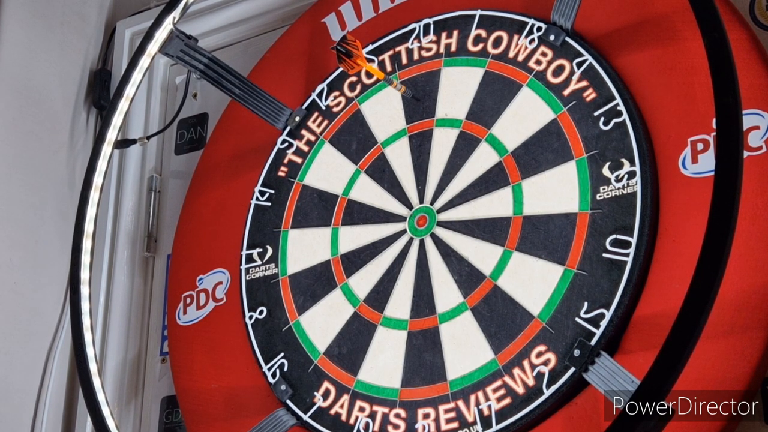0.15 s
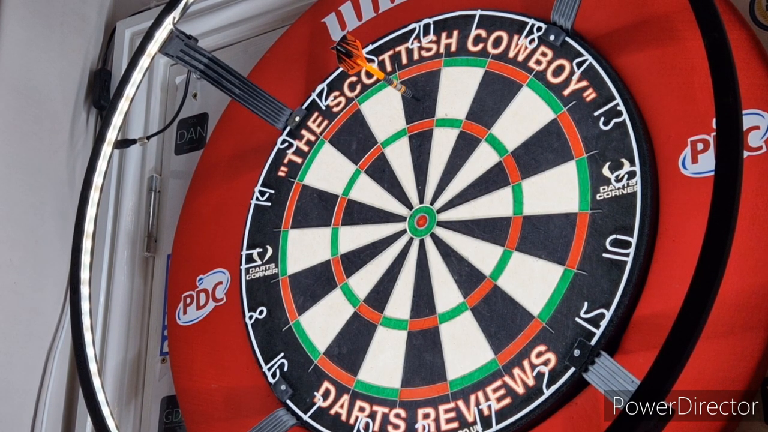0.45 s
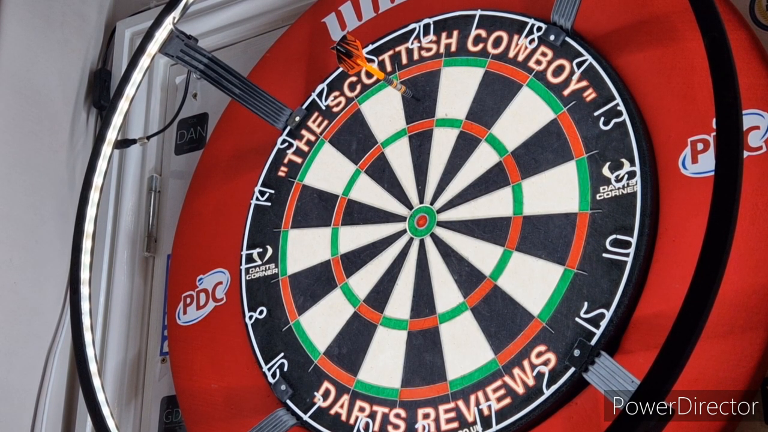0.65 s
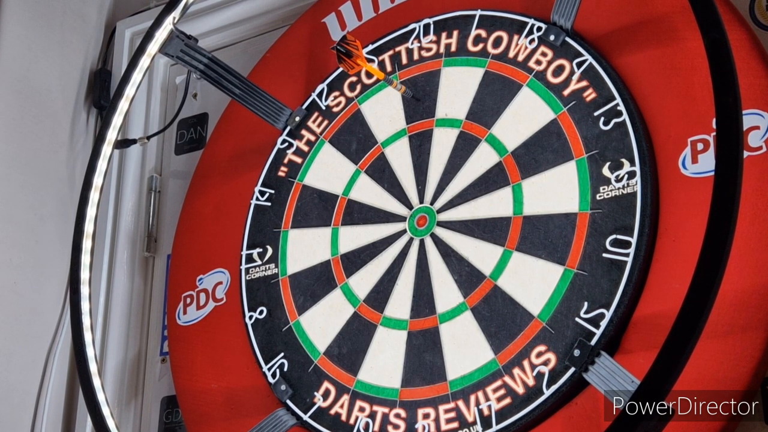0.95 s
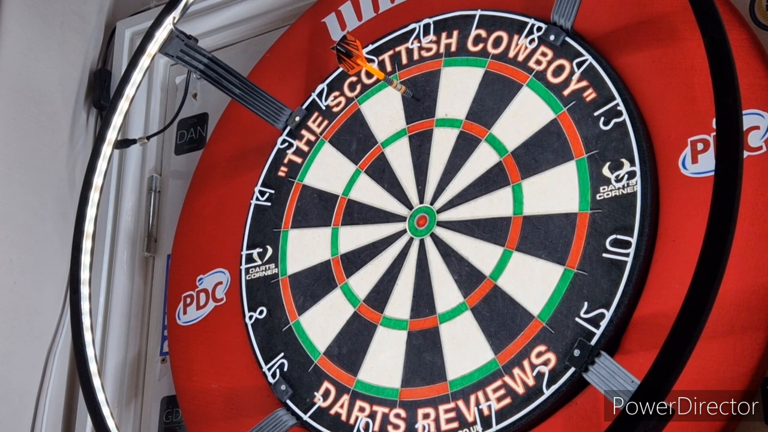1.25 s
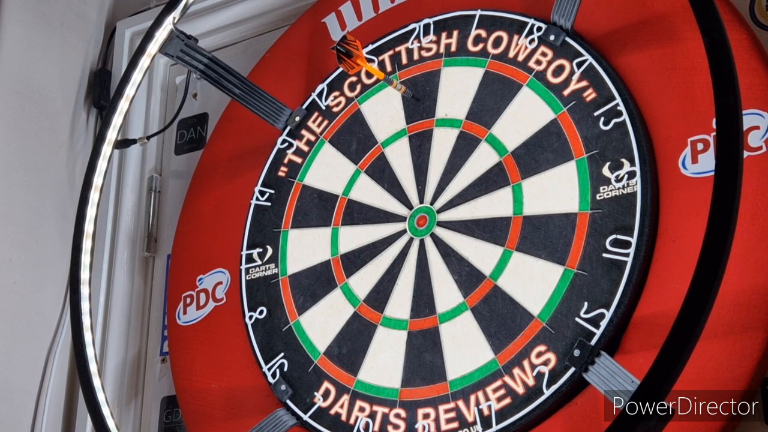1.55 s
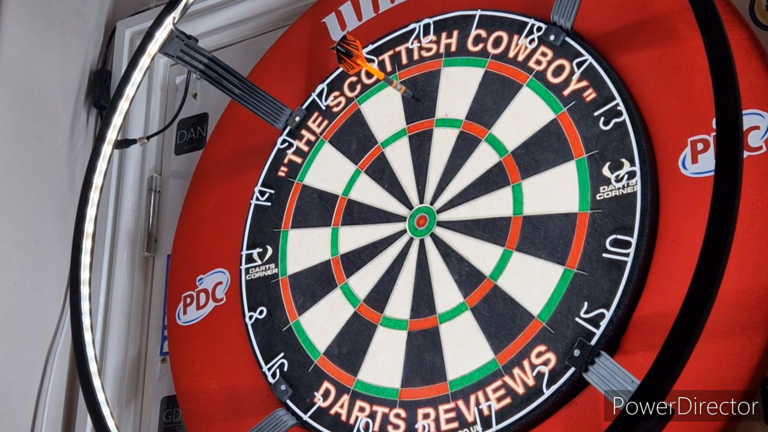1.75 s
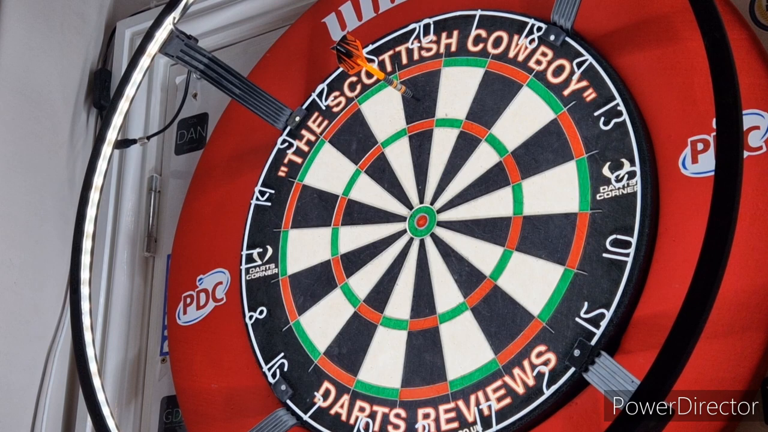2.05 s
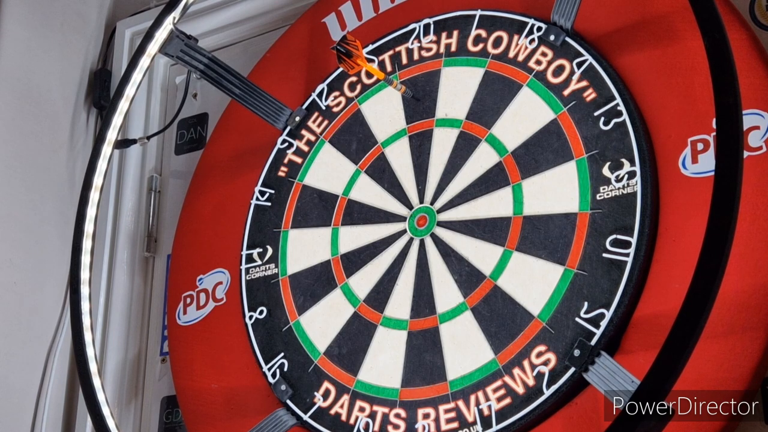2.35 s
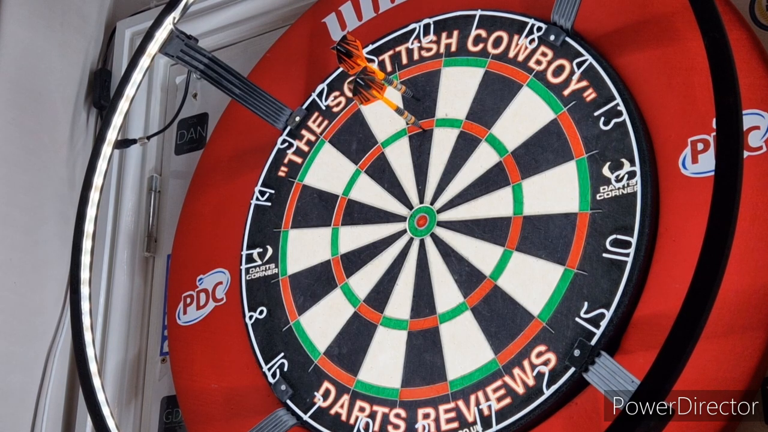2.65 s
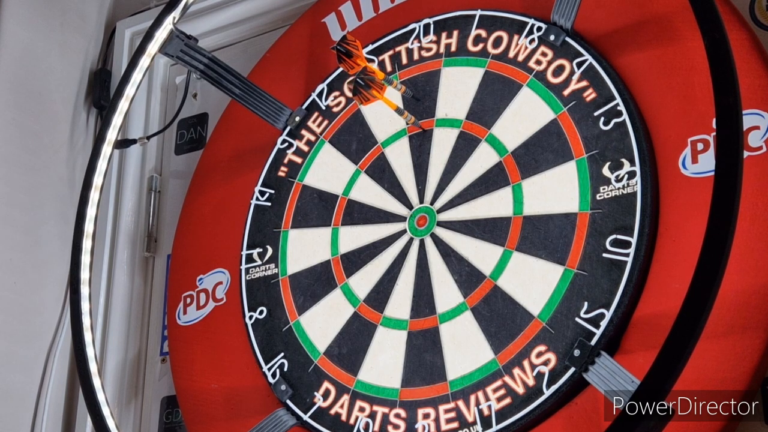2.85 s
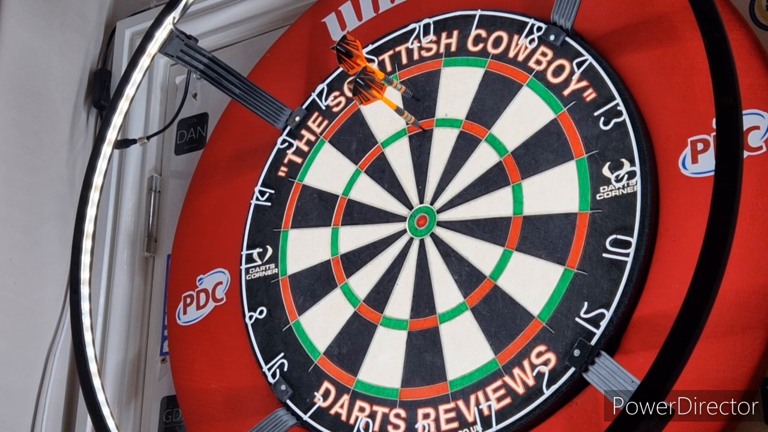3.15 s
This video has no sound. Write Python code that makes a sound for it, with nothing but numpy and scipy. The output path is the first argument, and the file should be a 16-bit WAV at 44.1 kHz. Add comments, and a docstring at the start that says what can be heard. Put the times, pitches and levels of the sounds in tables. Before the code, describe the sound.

One loud dart thud late in the scene, preceded by cloth rustle, metallic clinks and floor knocks, followed by softer knocks and faint whistles; near microphone, short indoor echo, low steady hum.

```python
"""Over a low steady hum and faint room tone, soft floor knocks, cloth rustle and dart clinks open the scene.
More clinks follow, then a whistle and a run of knocks; at 2.58 s a dart thuds into a fibre board on a wall.
More floor knocks, faint whistles and a rustle close it, all heard near by in a small quiet room.
Struck bodies are modal: forces or ticks excite decaying sines. The point's crack, whistles, cloth and air
are shaped noise; the hum is sines with narrow noise. A decaying-noise echo follows dart, knocks and clinks."""
import sys
import numpy as np
from scipy import signal
from scipy.fft import rfft, irfft
from scipy.io import wavfile

SR = 44100
rng = np.random.default_rng(int(sys.argv[2]) if len(sys.argv) > 2 else 0)


def to_wav(s):
    """Save 16-bit WAV."""
    ch = np.atleast_2d(s).T  # columns
    pcm = np.round(np.clip(ch, -1, 1) * 32767)  # PCM
    wavfile.write(sys.argv[1], SR, pcm.astype(np.int16))


N = 145530
T = np.arange(N) / SR
HZ = np.fft.rfftfreq(N, 1 / SR)


def undb(db):
    """Decibel definition: 20 dB is a tenfold amplitude ratio."""
    return 10 ** (np.asarray(db) / 20)


def curve(table, hz):
    """Logarithmic frequency scale: interpolate (Hz, value) points evenly per octave."""
    points = np.array(table, float)
    return np.interp(np.log(np.maximum(hz, 1)), np.log(points[:, 0]), points[:, 1])


def unit(x):
    """Root-mean-square level: scale to an rms of one."""
    return x / np.sqrt(np.mean(x ** 2))


# Stereo difference between the two ports: pitch_hz [Hz], side_minus_mid_db [dB]
PORT_SIDE = [(60, -12.5), (110, -19), (200, -5), (380, -6), (700, -0.5), (1290, -1.5), (2380, -1),
             (4400, 1), (8120, 0), (15000, -2)]


def wide(gain):
    """Diffuse-field coherence: noise of spectrum gain, alike at two ports in the bass, unrelated in the treble."""
    mid, side = rfft(rng.standard_normal((2, N))) * gain
    side = side * undb(curve(PORT_SIDE, HZ))
    return unit(irfft(np.array([mid + side, mid - side]), N))


def conv(a, b):
    """Linear superposition: convolve a source with a response, cut to the scene's length."""
    return signal.fftconvolve(np.atleast_2d(a), np.atleast_2d(b), axes=1)[:, :N]


def ring(modes, cycles=0.0087):
    """Modal decay: a one-second sum of fading sines, each with a build-up constant in cycles."""
    t = T[:SR]
    out = 0
    for hz, db, t60 in modes:
        decay = undb(db - 60 * t / max(t60, .005))  # no fade is shorter than 5 ms
        build_up = 1 - np.exp(-t * hz / cycles)
        out = out + decay * np.sin(2 * np.pi * hz * t) * build_up
    return out


def push(start_s, length_s):
    """Contact impulse: a smooth sine-squared force of unit area."""
    u = (T - start_s) / max(length_s, 3 / SR)
    force = np.where((u > 0) & (u < 1), np.sin(np.pi * u) ** 2, 0)
    return force / force.sum()


# Reverberation time of the room: pitch_hz [Hz], t60_s [s]
ROOM_DECAY = [(60, 0.65), (300, 0.3), (1000, 0.33), (4000, .27), (15000, 0.22)]
ROOM_RISE_S = 0.0045


def room():
    """Reverberant decay: half-octave noise bands fade at their own rates, scaled to unit energy per port."""
    spectrum = rfft(wide(1))
    t = T[:SR]
    out = 0
    for hz in 40 * 2 ** np.arange(0, 9, .5):
        octaves = np.log2(np.maximum(HZ, 1) / hz)
        window = np.cos(np.pi * np.clip(octaves, -.5, .5)) ** 2
        band = irfft(spectrum * window, N)[:, :SR]
        t60 = curve(ROOM_DECAY, hz)
        out = out + band * undb(-60 * t / t60) / np.sqrt(t60)  # equal energy whatever the fade
    out = out * np.minimum(t / ROOM_RISE_S, 1)
    return out / np.sqrt(np.sum(out ** 2) / 2)


# Room tone spectrum before the roll-off below 30 Hz: pitch_hz [Hz], relative_level_db [dB]
AIR_SPECTRUM = [(30, -8), (45, -3.5), (70, -6), (100, -14.5), (150, -19.5), (220, -23.5), (280, -28.5),
                (500, -36), (1000, -40.5), (1600, -44), (2500, -42), (3500, -50.5), (5200, -47),
                (6300, -53), (7600, -48), (9200, -54), (10200, -62), (13000, -54.5), (16000, -61)]
AIR_DB = -61.5  # rms


def air():
    """Stationary noise: steady room tone with a fixed spectrum."""
    roll_off = np.minimum(HZ / 30, 1) ** 2
    return undb(AIR_DB) * wide(undb(curve(AIR_SPECTRUM, HZ)) * roll_off)


# Partials of the machine hum: pitch_hz [Hz], level_db [dB rms], width_hz [Hz, half-width at half amplitude]
HUM_PARTIALS = [(52.2, -48, 3.1), (156.7, -73, 3), (208, -78, 12)]
HUM_STEADY = 0.93  # share of the power in the pure tone
HUM_LAG_S = .00037  # the tone reaches the left port first


def hum():
    """Line broadening: each partial of a low machine hum joins a steady sine to wavering narrow noise."""
    lag = np.array([[0], [HUM_LAG_S]])
    out = 0
    for hz, db, width in HUM_PARTIALS:
        tone = np.sqrt(2 * HUM_STEADY) * np.sin(2 * np.pi * (hz * (T - lag) + rng.random()))
        waver = np.sqrt(1 - HUM_STEADY) * wide(1 / (1 + ((HZ - hz) / width) ** 2))
        out = out + undb(db) * (tone + waver)
    return out


# Swells of the cloth: middle_s [s], level_db [dB], half_length_s [s, to 1/e]
CLOTH_SWELLS = [(0.037, -66.5, 0.1), (0.637, -74.5, 0.042), (1.84, -92, 0.055), (2.347, -70.5, 0.101),
                (3.185, -73.5, 0.086)]
# Cloth noise spectrum: pitch_hz [Hz], relative_level_db [dB per Hz]
CLOTH_SPECTRUM = [(100, 4), (300, -1), (800, -9.5), (2500, -10.5), (3700, -18), (5000, -16), (6300, -21.5),
                  (7800, -13.5), (10000, -26), (16000, -43)]


def rustle():
    """Friction noise: sleeve cloth brushes in soft Gaussian swells of broadband noise."""
    swell = sum(undb(db) * np.exp(-((T - middle) / half) ** 2) for middle, db, half in CLOTH_SWELLS)
    return swell * wide(undb(curve(CLOTH_SPECTRUM, HZ)))


# Faint short whistles: start_s [s], level_db [dB], fade_s [s, to 1/e], pitch_hz [Hz]
WHISTLES = [(1.72, -70, 0.057, 2490), (2.89, -78, 0.088, 3620), (3, -78.5, 0.12, 2470),
            (3.104, -80, 0.14, 2960), (3.196, -79, .04, 4020)]
WHISTLE_WIDTH_HZ, WHISTLE_RISE_S = 190, 0.0016


def pips():
    """Narrow-band noise: a small bandwidth makes wavering tones, which start sharply and fade."""
    out = 0
    for start, db, fade, hz in WHISTLES:
        rise = np.clip((T - start) / WHISTLE_RISE_S, 0, 1)
        shape = rise * np.exp(-(np.maximum(T - start, 0) / fade) ** 2)
        out = out + undb(db) * shape * wide(np.exp(-((HZ - hz) / WHISTLE_WIDTH_HZ) ** 2))
    return out


# Touches of the spare darts: start_s [s], level_db [dB], rise_s [s], rattle_fade_s [s, to 1/e],
# low_pitch_hz [Hz], low_ring_db [dB], mid_rings_db [dB, added near 4.5 kHz], tilt_db [dB per octave about 4 kHz]
DART_TOUCHES = [(0.026, -71, 0.0038, 0.019, 2880, 12.5, -10, -4),
                (.059, -57, 0.00084, 0.0061, 1810, 1, -1.5, -5),
                (0.086, -55.5, 0.017, 0.021, 1786, -9, -1.5, 8),
                (0.474, -59, 0.0012, 0.012, 1950, 6.5, -5.5, 1),
                (0.621, -73, 0.0027, 0.01, 1920, -1, -1, -1),
                (1.221, -58, 0.0062, 0.012, 1645, 4, 2.5, 5.5),
                (1.224, -64, 0.0016, 0.021, 1965, 11.5, 5.5, -7),
                (1.791, -75, 0.022, 0.041, 1920, 5.5, -5.5, 5)]
# Upper rings of barrels and shafts before the touch alters them:
# pitch_hz [Hz], relative_level_db [dB], t60_s [s, at least 0.005 when played]
DART_RINGS = [(3350, -7.5, 0.01), (4030, -9.5, 0.016), (4290, -11, 0.0087), (4760, 7, 0.011),
              (5070, 3, 0.0088), (6300, -6, 0.0055), (7320, 3.5, 0.0059), (8950, 2.5, 0.0056),
              (9600, -7, 0.0027), (11840, -11, 0.0034), (13400, -19, 0.0039), (14600, -12, 0.0032)]
CLINK_LOW_T60_S, CLINK_DETUNE = .028, 0.014  # detune: spread of the pitch ratio
CLINK_GRAIN_DB = 4  # spread of the tick levels
CLINK_SCUFF_DB, CLINK_WET_DB = -14, 3.5  # bare ticks; echo


def clinks(echo):
    """Modal excitation: runs of tiny ticks are heard bare and through the rings of darts held in a hand."""
    n = int(.15 * SR)
    t = T[:n]
    dry = np.zeros((1, N))
    for start, db, rise, fade, low_hz, low_db, mid_db, tilt in DART_TOUCHES:
        shape = np.minimum(t / rise, 1) * np.exp(-np.maximum(t - rise, 0) / fade)
        ticks = rng.standard_normal(n) * undb(CLINK_GRAIN_DB * rng.standard_normal(n)) * shape
        detune = 1 + CLINK_DETUNE * rng.standard_normal(len(DART_RINGS))
        modes = [(low_hz, low_db, CLINK_LOW_T60_S)]
        for (hz, ring_db, t60), ratio in zip(DART_RINGS, detune):
            near_mid = abs(np.log2(hz / 4500)) < 1 / 3  # octaves
            touched_db = ring_db + tilt * np.log2(hz / 4000) + mid_db * near_mid
            modes.append((hz * ratio, touched_db, t60))
        body = ring(modes)[:n]
        body[1:3] += undb(CLINK_SCUFF_DB) * np.array([1, -.5])  # passes the ticks bare
        clink = signal.fftconvolve(ticks / np.linalg.norm(ticks), body)
        k = int(start * SR)
        dry[0, k:k + len(clink)] += undb(db) * clink
    return dry + undb(CLINK_WET_DB) * conv(dry, echo)


# Blows on the floor: start_s [s], level_db [dB, before KNOCK_DB], contact_s [s],
# boom_db [dB, joist push relative to level_db]
FLOOR_BLOWS = [(.003, -53.5, 0.00076, 2), (.06, -59, 0.0012, 0), (2.1, -33.5, .0006, -10),
               (2.134, -39.5, 0.00088, -2), (2.159, -44.5, 0.0007, -1), (2.175, -44, 0.0014, 3),
               (2.201, -58, 0.00051, -4), (2.861, -37.5, 0.00071, -4), (2.897, -39, 0.0011, -3),
               (2.929, -42.5, 0.0014, -3), (2.958, -46.5, 0.00092, -0.5), (2.985, -52, 0.0011, 3),
               (3.042, -51.5, .0007, 0), (3.072, -36.5, 0.00079, -12), (3.109, -49.5, 0.00073, 5.5),
               (3.149, -58.5, 0.0011, 5)]
# Modes of the floor boards: pitch_hz [Hz], relative_level_db [dB], t60_s [s]
FLOOR_MODES = [(245.4, 0.5, 0.028), (324, -4.5, 0.021), (387, 3.5, 0.02), (546, 4, 0.013),
               (760, -10, 0.032), (1058, -12, 0.042), (1400, -9, 0.0095), (2016, -12.5, 0.0078)]
# Modes of the joists: pitch_hz [Hz], relative_level_db [dB], t60_s [s]
JOIST_MODES = [(59.4, -6.5, 0.13), (88, -4, 0.18), (151.3, -0.5, 0.067)]
KNOCK_DB, KNOCK_WET_DB = -6.5, -1  # force on the boards; echo
KNOCK_SPREAD_S = 0.0032  # from the start to the peak of the crunch


def knocks(echo):
    """Forced vibration: a push inside an uneven crunch rings the floor boards; a slower one shakes the joists."""
    force = boom = 0
    for start, db, contact, boom_db in FLOOR_BLOWS:
        u = np.maximum(T - start, 0) / KNOCK_SPREAD_S
        rough = u * np.exp(-u) * rng.standard_normal(N)
        crunch = conv(rough, push(0, contact)[:400])  # longer contact dulls the crunch
        crunch = crunch / np.linalg.norm(crunch) / np.sqrt(contact * SR)
        firm = push(start + KNOCK_SPREAD_S, contact)
        force = force + undb(db + KNOCK_DB) * (crunch + firm)
        boom = boom + undb(db + boom_db) * push(start, 2 * KNOCK_SPREAD_S)
    dry = conv(force, ring(FLOOR_MODES)) + conv(boom, ring(JOIST_MODES))
    return dry + undb(KNOCK_WET_DB) * conv(dry, echo)


# Crack of the point in the fibres: pitch_hz [Hz], relative_level_db [dB]
TIP_SPECTRUM = [(300, -30), (700, -15.5), (1400, 0), (2000, -5), (2500, -12), (3500, -21), (4500, -20.5),
                (8500, -25.5), (11000, -36), (13000, -33.5), (15200, -27), (16000, -41.5)]
# Modes of the board and its mount: pitch_hz [Hz], relative_level_db [dB], t60_s [s]
BOARD_MODES = [(335, -18.5, 0.1), (381, -11.5, 0.3), (426.6, -1.5, 0.1), (604.6, 2, 0.069),
               (639.5, -8, 0.13), (788, -6.5, 0.083), (941, -26.5, 0.44), (1004, -10, 0.12),
               (1054, -10, .12), (1246, -1, 0.04), (1315, -27.5, 0.42), (1326, -2, 0.053),
               (1491, -12.5, 0.062), (1560, -25, 0.36), (1721, -27, 0.53), (1917, -4, 0.027)]
# Modes of the wall panel: pitch_hz [Hz], relative_level_db [dB], t60_s [s]
WALL_MODES = [(50.3, -16.5, 1), (58.3, 2.5, 0.29), (66, -4.5, 0.25), (76.4, -14.5, 0.62), (104, -8, .12),
              (125, -14, .12), (136, -7.5, .15), (162.9, -21.5, 0.38), (208.8, -27, 0.27)]
TIP_S, BOARD_S, WALL_S = 2.5775, 2.5805, 2.5815  # point bites, board gives, wall moves
TIP_DB, BOARD_DB, WALL_DB = -17, -12.5, -9
TIP_WET_DB, BOARD_WET_DB, WALL_WET_DB = 2, -5, -9  # sent to the echo
TIP_RISE_S, TIP_T60_S = 0.0044, .024
BOARD_PUSH_S, WALL_PUSH_S = 0.00045, 0.0041
BOARD_RISE_CYCLES, WALL_RISE_CYCLES = 2.4, .4  # build-up constants of the rings


def dart(echo):
    """Impact coupling: the point cracks into the fibres, the board rings, then the wall booms."""
    t = T - TIP_S
    tip_shape = undb(TIP_DB - 60 * np.maximum(t, 0) / TIP_T60_S) * np.clip(t / TIP_RISE_S, 0, 1)
    tip = wide(undb(curve(TIP_SPECTRUM, HZ))) * tip_shape
    board = undb(BOARD_DB) * conv(push(BOARD_S, BOARD_PUSH_S), ring(BOARD_MODES, BOARD_RISE_CYCLES))
    wall = undb(WALL_DB) * conv(push(WALL_S, WALL_PUSH_S), ring(WALL_MODES, WALL_RISE_CYCLES))
    wet = undb(TIP_WET_DB) * tip[0] + undb(BOARD_WET_DB) * board + undb(WALL_WET_DB) * wall
    return tip + board + wall + conv(wet, echo)


def scene():
    """Superposition: the pressures of all sources add, and one room echo serves the struck ones."""
    echo = room()
    background = air() + hum() + rustle() + pips()
    return background + clinks(echo) + knocks(echo) + dart(echo)


LOW_CUT_HZ, TOP_HZ = 40, 15700


def record(dry):
    """Band limiting: the recorder thins the deep bass and cuts the top."""
    high_pass = signal.butter(4, LOW_CUT_HZ, "high", fs=SR, output="sos")
    low_pass = signal.ellip(8, .2, 70, TOP_HZ, fs=SR, output="sos")  # ripple and stop-band depth in dB
    return signal.sosfilt(low_pass, signal.sosfilt(high_pass, dry))


dry = scene()
out = record(dry)
to_wav(out)
```